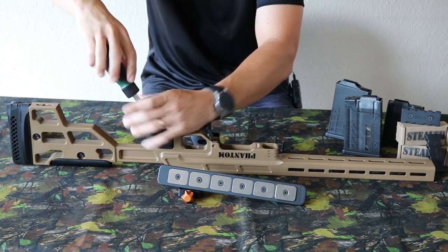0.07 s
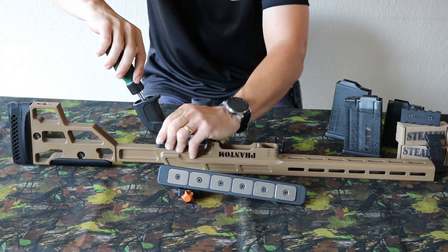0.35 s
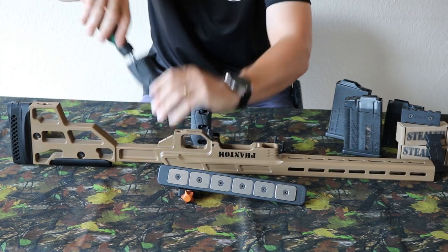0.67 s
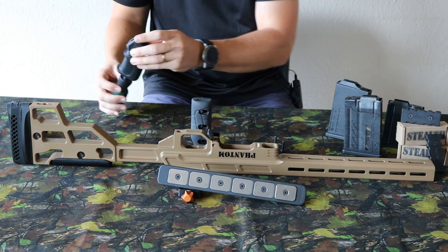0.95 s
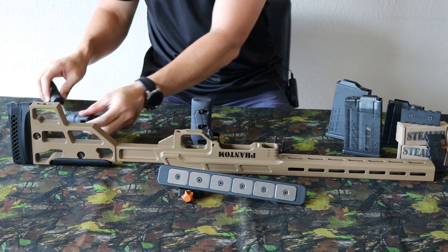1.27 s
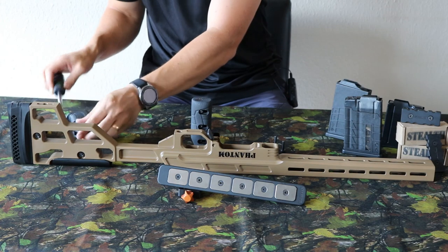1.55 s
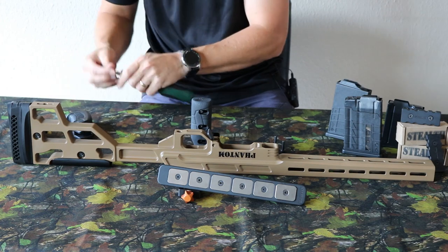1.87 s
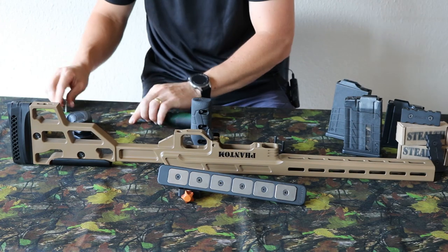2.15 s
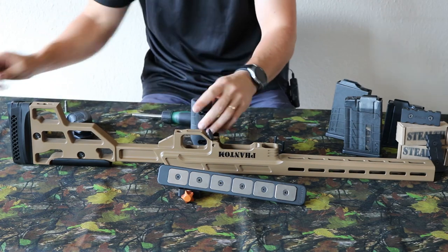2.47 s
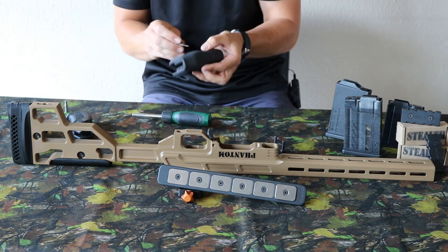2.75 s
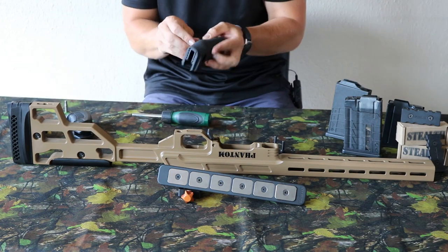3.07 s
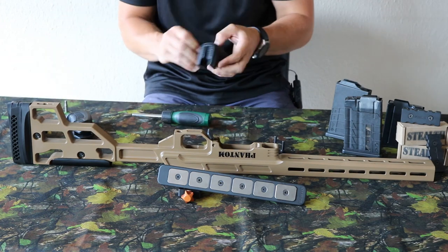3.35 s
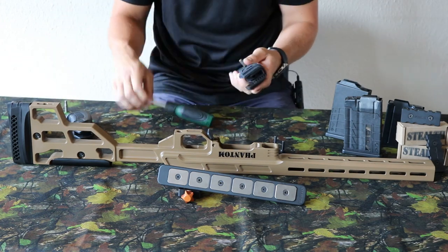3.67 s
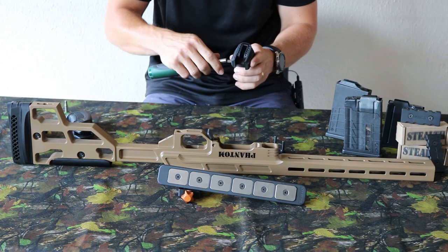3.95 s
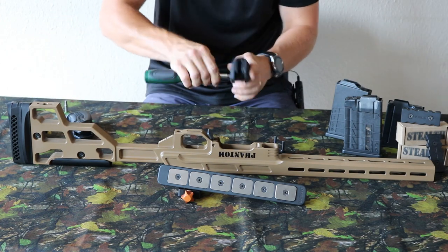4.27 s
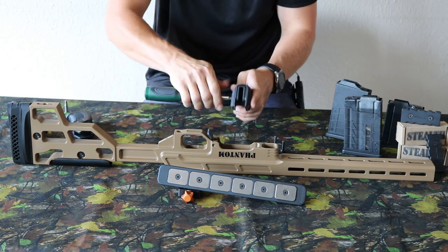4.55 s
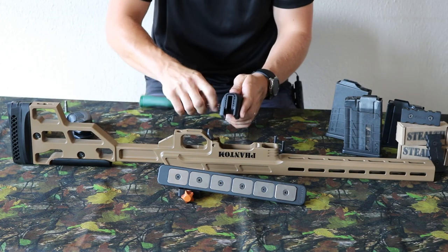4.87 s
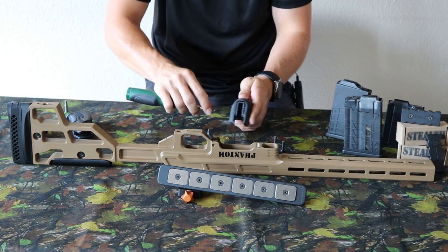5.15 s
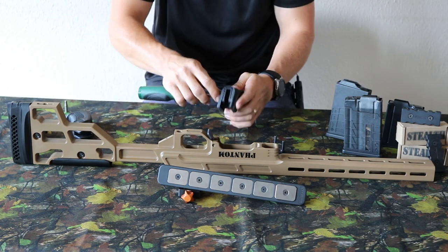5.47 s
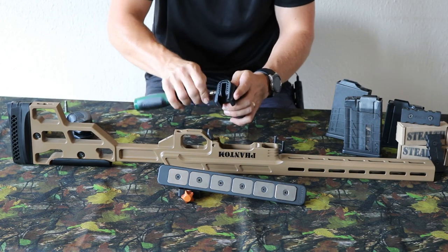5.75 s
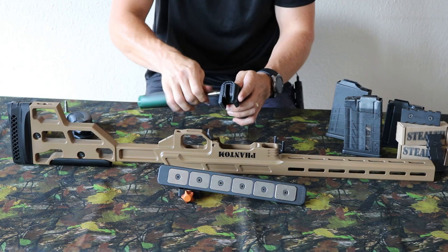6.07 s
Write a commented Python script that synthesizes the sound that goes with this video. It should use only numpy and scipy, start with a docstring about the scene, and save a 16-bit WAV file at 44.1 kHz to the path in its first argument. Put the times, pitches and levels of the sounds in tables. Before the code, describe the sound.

Plastic clacks, steel clinks and hollow knocks as a rifle grip comes off on a table, then sparse screwdriver ticks.

```python
"""Sharp plastic clacks, steel clinks and booming knocks, then small, sparse ticks: a plastic grip comes
off a metal rifle chassis on a cloth-covered table. Parts knock and slide and set the table ringing,
a loose screw clinks and jingles, and the grip sticks and slips on the stock with a squeak. The screwdriver
tip ticks in the screw head, and fingers swish round the handles over the quiet hum of a small room."""
import sys
import numpy as np
from scipy import signal
from scipy.fft import rfft, irfft
from scipy.io import wavfile

SR = 44100
rng = np.random.default_rng(int(sys.argv[2]) if len(sys.argv) > 2 else 0)


def wav_out(sig):
    """Save sig, one row per channel (or a flat mono array), as 16-bit PCM at SR to the path in sys.argv[1]."""
    wavfile.write(sys.argv[1], SR, np.round(np.clip(np.atleast_2d(sig).T, -1, 1) * 32767).astype(np.int16))


N = 269451
TIME = np.arange(N) / SR
AGE = TIME[:SR // 2]   # seconds since a hit

# resonances of table and chassis: (frequency [Hz], level [dB], t60 [s])
TABLE_MODES = [(212.4, -20, 0.12), (226, -10.5, 0.0073), (271.4, 0.5, 0.18), (357, -13, 0.15),
               (405, -33, 0.012), (541.5, -6.5, 0.18), (627, -7, 0.088), (723, 2, 0.017), (838, 1.5, 0.038),
               (960, 2, 0.025), (1050, 5, 0.015), (1090, 0, 0.066), (1250, -32, 0.12), (1440, -14, 0.069),
               (1520, -22, 0.18), (1890, 0, 0.028), (2217, -16.5, 0.012), (2970, -5.5, 0.043)]


def clacks(level_db=2, hollow_t60_s=0.024, snap_db=-7):
    """Struck plastic: its hollow rings at a note set by the hand, shorter when it is held tight."""
    # hits on grip or screwdriver handle:
    # (time [s], level [dB], hollow note [Hz], treble [dB], ring length [ratio])
    hits = [(0.042, -38, 1910, -5, 1.0), (0.1192, -25.5, 3400, -2, 0.22), (0.226, -35.5, 1500, -2, .4),
            (0.497, -23.5, 2230, -5, 0.94), (1.089, -30, 3000, 3, 0.24), (1.1141, -12, 2420, 14.5, 0.22),
            (1.2458, -10.5, 1474, -25, 0.77), (2.1691, -26, 1130, -35, 0.49),
            (2.2304, -10, 4330, -12, 0.11)]
    # resonances of the plastic: (frequency [Hz], level [dB], t60 [s])
    grip_modes = [(3400, -13.5, 0.018), (5940, -13.5, 0.021), (8500, -34, 0.05), (9670, -11, 0.012),
                  (11200, -18, 0.01), (11900, -17, 0.0078), (13800, -19, 0.0083), (15200, -19, .025),
                  (15400, -32, .04)]
    out = np.zeros(N)
    for s, db, hz, treble_db, ring_length in hits:
        modes = np.array([(hz, 0, hollow_t60_s), *grip_modes]) * [1, 1, ring_length]
        clack = ring(modes) + from_db(snap_db) * snap(length_s=0.0041)
        add(out, s, from_db(db + level_db) * brighten(clack, treble_db, corner_hz=4900))
    return out


def clinks(level_db=2):
    """Steel on steel: a scratch and a short, high ring."""
    # the screw hits the screwdriver shaft: (time [s], level [dB], scratch [dB])
    hits = [(0.1564, -33.5, 2), (0.8575, -14, -10.5), (0.8651, -18, -6), (1.158, -36, -2), (1.176, -22, 2),
            (1.183, -29, 2), (1.2012, -27.5, -2), (1.2153, -21, -3)]
    # resonances of the steel: (frequency [Hz], level [dB], t60 [s])
    steel_modes = [(2040, 2.5, 0.0074), (3350, 4, 0.0066), (3500, -14, 0.0046), (6430, -14, 0.008),
                   (6650, 7, 0.012), (6790, 7, 0.029), (7200, -12, 0.008), (9260, -2, 0.021),
                   (11700, -21, 0.0065), (14600, -26, .006)]
    out = np.zeros(N)
    for s, db, scratch_db in hits:
        note = ring(steel_modes) + from_db(scratch_db) * snap(length_s=0.0011)
        add(out, s, from_db(db + level_db) * note / np.abs(note).max())
    return out


def knocks(clatter_db=-4, impact_db=-2, snap_db=-19, boom_db=-3, crack_db=-3):
    """A short impact sets table and chassis ringing; hardness trades boom for crack."""
    # parts land on the table or against the chassis: (time [s], level [dB], hardness [dB])
    hits = [(0.1192, -46.5, -1), (1.1762, -49, -7), (1.2465, -26.5, -1.5), (1.3032, -39.5, -4),
            (1.3058, -37.5, 8), (1.4001, -36.5, -10), (1.5462, -31.5, -10), (1.6596, -29, -11.5),
            (2.1684, -45.5, -8.5), (2.2293, -28, -5.5), (2.3094, -57, -20), (2.599, -65, 1),
            (3.8098, -52, -5.5)]
    # the hard, quickly damped swing of the struck spot: (frequency [Hz], level [dB], t60 [s])
    impact_modes = [(676, 17, 0.016), (1160, 7, 0.033), (1635, -1, 0.028), (3000, 7.5, 0.0024),
                    (3520, 7, 0.00088), (5030, -37, 0.0077), (10000, -25, 0.002), (12900, -16, 0.002)]
    # the crowd of short-lived modes between the main ones: (frequency [Hz], level [dB])
    clatter_colour = [(150, -37), (300, 3.5), (500, 3), (800, 4.5), (1400, 2.5), (2200, 4), (3500, -1),
                      (5500, 2), (7000, -8.5), (9300, -24.5), (12000, -38), (16000, -32)]
    # decay of that clatter: (frequency [Hz], t60 [s])
    clatter_t60 = [(200, 0.085), (800, 0.16), (2500, 0.08), (8000, 0.05), (16000, 0.045)]
    edges_hz = (190, 400, 2000, 16000)   # boom, body, crack
    out = np.zeros(N)
    for s, db, hardness_db in hits:
        levels_db = db + np.array([boom_db - hardness_db, 0, crack_db + hardness_db])
        impact = from_db(impact_db) * cut(ring(impact_modes), 750, "high")
        impact += from_db(snap_db) * snap(length_s=0.0018)
        body = ring(TABLE_MODES) + from_db(clatter_db) * dying_noise(clatter_colour, clatter_t60)
        knock = voiced(impact + body, edges_hz, levels_db, attack_samples=882)
        add(out, s, knock + from_db(levels_db[0]) * table_sway())
    return out


def table_sway(hz=104, t60_s=0.1, level_db=-17):
    """The whole table top gives a little under a blow."""
    return from_db(level_db) * np.sin(2 * np.pi * hz * AGE) * decay(t60_s)


def ticks(slip_s=0.0014, slip_db=-15, tail_db=-8, thread_start_s=4.6554, thread_gap_s=0.099):
    """The tip skids for an instant and the hand damps it at once; the room answers with a broad hiss."""
    # screw and tip catch and slip: (time [s], level [dB], hardness [dB], tip ring [dB])
    slips = [(0.3088, -54, 4, -5), (1.8201, -45.5, -1, 0), (1.9278, -65, 14, 5), (2.0197, -54.5, 14, 1),
             (3.0456, -62.5, 12.5, 5), (3.276, -53, 10.5, 5.5), (3.33, -52, -6, 3), (3.8847, -62, 3, 5),
             (4.033, -49.5, -0.5, -13), (4.0811, -54.5, -1, 13.5), (4.1344, -39, 7.5, 5),
             (4.2163, -30, 0, 7), (4.3213, -50, 8, 10.5), (4.405, -57, -12, 3), (4.5543, -56.5, 6, 8),
             (5.4286, -55.5, -3.5, -3), (5.5803, -43, 4, 5.5), (5.6728, -60, -12.5, -4),
             (5.79, -45.5, 7, 2), (5.9769, -52.5, 3, 17), (6.0926, -51.5, 3, 6.5)]
    # resonances of the tip: (frequency [Hz], level [dB], t60 [s])
    tip_modes = [(990, -27, 0.028), (1500, -44, 0.008), (2800, 7, 0.0035), (4300, 9, 0.0023),
                 (6400, -11, 0.0023), (7150, 5, 0.00091), (10860, -4.5, 0.0022), (13500, 5.5, 0.0014),
                 (14800, -9, 0.0036)]
    # share of the hardness each band gets: (body [ratio], tip [ratio], ring [ratio], sparkle [ratio])
    tilt = (-1.16, 0.1, 0.72, 1)
    # the tick as it spreads into the room in all directions: (frequency [Hz], level [dB])
    tail_colour = [(300, -40), (1000, -6.5), (2700, -1), (4500, -1.5), (6500, -1), (8500, -5), (10000, -6),
                   (16000, -14)]
    # the thread catches in an even run of faint ticks as the screw turns; columns as in slips
    thread_catches = [(thread_start_s + k * thread_gap_s, -59, 5, 3) for k in range(3)]
    edges_hz = (400, 3300, 5500, 9000, 16500)   # body, tip, ring, sparkle
    out = np.zeros(N)
    for s, db, hardness_db, tip_db in slips + thread_catches:
        levels_db = db + hardness_db * np.array(tilt) + np.array([0, tip_db, 0, 0])
        click = AGE == 0
        skid = from_db(slip_db) * rng.standard_normal(len(AGE)) * np.exp(-AGE / slip_s)
        tip = signal.fftconvolve(ring(tip_modes), click + skid)[:len(AGE)]
        tick = voiced(tip, edges_hz, levels_db, attack_samples=110)
        add(out, s, tick + from_db(tail_db) * np.linalg.norm(tick) * room_tail(tail_colour))
    return out


def jingles(gap_s=0.0066, loss_db=2, buzz_db=-1, hops=5):
    """A small loose metal part hops and buzzes a few times, weaker each time."""
    # heavy thumps shake the part: (time [s], first hop's peak [dB])
    shakes = [(1.551, -35.5), (1.667, -34)]
    # resonances of the part: (frequency [Hz], level [dB], t60 [s])
    modes = [(6820, -2.5, 0.036), (8250, -21, 0.0043), (8560, 2, 0.03), (9000, -3, 0.03), (9200, -5, .06),
             (11270, -10, 0.055), (12600, -14, .015), (13800, -4, .05)]
    out = np.zeros(N)
    for s, db in shakes:
        for hop in range(hops):
            note = ring(modes) + from_db(buzz_db) * cut(snap(length_s=0.011), [6000, 14500], "band")
            landing_s = s + gap_s * (hop + rng.random() / 2)
            add(out, landing_s, from_db(db - loss_db * hop) * note / np.abs(note).max())
    return out


def squeaks(partials_db=(-5, 2, -12, -14), jitter_depth=0.11, flutter_db=3):
    """Stick and slip: a rough, unsteady tone that follows the sliding speed."""
    # the grip slides on the stock:
    # (start [s], length [s], start pitch [Hz], middle pitch [Hz], end pitch [Hz], level [dB])
    slides = [(1.173, 0.06, 1100, 783, 590, -39.5), (1.315, 0.0245, 1050, 1533, 920, -41.5)]
    out = np.zeros(N)
    jitter = 1 + jitter_depth * wobble(800)
    for s, length_s, *glide_hz, db in slides:
        pitch = np.interp(TIME, [s, s + length_s / 2, s + length_s], glide_hz) * jitter
        phase = 2 * np.pi * np.cumsum(pitch) / SR
        tone = sum(from_db(level) * np.sin(k * phase) for k, level in enumerate(partials_db, 1))
        out += tone * strokes([(s, length_s, db)], attack_s=0.0022, release_s=0.0064)
    return out * from_db(flutter_db * wobble(430))


def drags(groan_db=1, scuff_hz=(460, 880), attack_s=0.009, release_s=0.015):
    """Friction on the cloth keeps the low table modes groaning; a dry scuff lies above them."""
    # parts slide on the table top: (start [s], length [s], level [dB], relative scuff [dB])
    slides = [(0.101, 0.055, -53.5, 6), (0.187, 0.09, -47.5, -23), (0.473, 0.073, -49, -6),
              (2.138, 0.048, -45.5, -9.5), (2.444, 0.06, -66, 10), (2.568, 0.073, -44, -19),
              (3.703, 0.14, -46, -10.5)]
    low_modes = cut(cut(ring(TABLE_MODES), 340, "low", order=4), 220, "high", order=4)
    force = strokes([(s, span, db + groan_db) for s, span, db, _ in slides], attack_s, release_s)
    scuff = strokes([(s, span, db + lift) for s, span, db, lift in slides], attack_s, release_s)
    groan = signal.fftconvolve(force * rng.standard_normal(N), energy_one(low_modes))[:N]
    return groan + scuff * rms_one(cut(rng.standard_normal(N), scuff_hz, "band"))


def hand_rubs(level_db=-2, grain_db=7):
    """Skin drags over plastic and metal in a fine, uneven grain."""
    # hands slide over chassis and table: (start [s], length [s], level [dB])
    rubs = [(0.0, 0.17, -52), (0.1, 0.35, -54), (0.46, 0.22, -59), (1.17, 0.07, -49), (2.09, 0.31, -54),
            (3.78, 0.11, -47.5)]
    # mid-heavy skin friction: (frequency [Hz], level [dB])
    colour = [(200, -6), (500, 8.5), (900, 4), (1600, 4.5), (2600, -9), (5000, -6), (7000, -9),
              (15000, -34)]
    grain = from_db(grain_db * wobble(120))
    force = strokes(rubs, attack_s=0.05, release_s=0.12)
    return from_db(level_db) * force * rms_one(noise(colour) * grain)


def swishes(attack_s=0.072, release_s=0.12, grain_db=1):
    """A light touch gives a smooth swish with a thin hiss on top."""
    # fingers slide round grip and handle: (start [s], length [s], level [dB], relative hiss [dB])
    slides = [(0.13, 0.65, -57, -9.5), (0.824, 0.39, -56, -16), (1.368, 0.4, -60, -4),
              (1.743, 0.17, -52.5, -9), (1.993, 0.39, -54.5, -9), (2.585, 0.25, -56, -12),
              (2.79, 0.28, -62, -4), (3.234, 0.35, -56, -9), (3.75, 0.26, -59, -9), (4.04, 0.7, -60, -8.5),
              (4.862, 0.36, -60, -15), (5.499, 0.41, -58.5, -17)]
    # soft finger friction: (frequency [Hz], level [dB])
    colour = [(200, -4), (500, -3), (900, 2.5), (1500, 1), (2000, -1), (2600, 2), (3300, -4), (5400, -11),
              (6600, -14.5), (15000, -15.5)]
    grain = from_db(grain_db * wobble(41))
    swish = strokes([(s, span, db) for s, span, db, _ in slides], attack_s, release_s)
    hiss = strokes([(s, span, db + lift) for s, span, db, lift in slides], attack_s, release_s)
    return grain * (swish * noise(colour) + hiss * wavering(hz=4850, width_hz=900))


def rumbles():
    """Shifting weight stirs the table into a dull rumble."""
    # arms shift on the table: (start [s], length [s], level [dB])
    shifts = [(0.28, 0.477, -59), (2.8, 0.377, -56)]
    # the table's low end: (frequency [Hz], level [dB])
    colour = [(25, -28), (60, -1), (100, 2.5), (160, -6), (320, -4), (500, -26.5), (2000, -58)]
    return strokes(shifts, attack_s=0.012, release_s=0.042) * noise(colour)


def room(x, wet_db=-9):
    """A small, well damped room adds a short tail."""
    # tone of the reflections: (frequency [Hz], level [dB])
    colour = [(150, 0), (300, 1.5), (500, 3), (1000, -2.5), (3000, -1), (6500, -2.5), (10000, -0.5),
              (16000, -10)]
    return x + from_db(wet_db) * signal.fftconvolve(x, room_tail(colour))[:N]


def room_tail(colour, bounce_s=0.00661, bounce_db=2, bounce_width_s=0.00011):
    """Reflections start with a cluster off the table top and then die away; energy 1."""
    # decay of the room: (frequency [Hz], t60 [s])
    t60s = [(200, 0.15), (2500, 0.2), (7000, 0.23), (16000, 0.15)]
    build_up = np.clip(2 * AGE / bounce_s - .5, 0, 1)
    bounce = from_db(bounce_db) * np.exp(-((AGE - bounce_s) / bounce_width_s) ** 2)
    return energy_one((build_up + bounce) * dying_noise(colour, t60s))


def room_tone(air_db=-61, hiss_db=-58.5):
    """Room air and hums reach both channels alike; each channel has its own hiss."""
    # a low drone: (frequency [Hz], width [Hz], level [dB])
    drone = (96.8, 35.7, -63)
    # a deep hum and a faint higher one: (frequency [Hz], width [Hz], level [dB])
    hums = [(59.2, 41, -65), (787, 23.6, -71.5)]
    # dark room air: (frequency [Hz], level [dB])
    air_colour = [(20, -5), (45, -16), (70, -1), (130, -5.5), (200, -6), (300, -10.5), (750, -13.5),
                  (1100, -17), (2000, -17), (3500, -22.5), (6000, -24), (16000, -31)]
    # nearly white hiss: (frequency [Hz], level [dB])
    hiss_colour = [(30, -1), (300, 3.5), (800, 2.5), (2500, 1.5), (14000, 2), (16000, -3)]
    hum = sum(from_db(db) * wavering(hz, width_hz) for hz, width_hz, db in [drone, *hums])
    air = from_db(air_db) * noise(air_colour)
    hiss = from_db(hiss_db) * np.array([noise(hiss_colour), noise(hiss_colour)])
    return air + hum + hiss


def ring(modes, scatter_db=2):
    """Struck modes; each blow lands elsewhere and shares out its strength anew. Energy 1."""
    hz, db, t60 = np.transpose(modes)[:, :, None]
    strength = from_db(db + scatter_db * rng.standard_normal(hz.shape))
    return energy_one(np.sum(strength * np.sin(2 * np.pi * hz * AGE) * decay(t60), axis=0))


def snap(length_s):
    """The rough instant of contact; energy 1."""
    return energy_one(cut(rng.standard_normal(len(AGE)) * np.exp(-AGE / length_s), 1500, "high"))


def brighten(x, treble_db, corner_hz):
    """A harder contact lifts the treble, a softer one dulls it; peak 1."""
    x = x + (from_db(treble_db) - 1) * cut(x, corner_hz, "high", order=1)
    return x / np.abs(x).max()


def voiced(blow, edges_hz, levels_db, attack_samples):
    """Where and how hard a blow lands sets the level of each band over its attack."""
    out = 0
    for k, db in enumerate(levels_db):
        band = cut(blow, edges_hz[k:k + 2], "band")
        polarity = (-1) ** k   # neighbouring bands meet in opposite phase
        out = out + polarity * from_db(db) * band / np.std(band[:attack_samples])
    return out


def strokes(rows, attack_s, release_s):
    """Force of sliding movements: each builds up, holds and lets go."""
    force = np.zeros(N)
    for s, length_s, db in rows:
        rise = np.clip((TIME - s) / attack_s, 0, 1)
        fall = np.clip((s + length_s - TIME) / release_s, 0, 1)
        force += from_db(db) * rise * fall
    return force


def dying_noise(colour, t60s):
    """A burst whose bands each die at their own rate; energy 1."""
    edges = np.geomspace(100, 18000, 16)
    hz = np.fft.rfftfreq(len(AGE), 1 / SR)
    spectrum = rfft(rng.standard_normal(len(AGE))) * from_db(at_hz(colour, hz))
    out = 0
    for low, high in zip(edges, edges[1:]):
        band = irfft(spectrum * (hz >= low) * (hz < high), len(AGE))
        out = out + band * decay(at_hz(t60s, np.sqrt(low * high)))
    return energy_one(out)


def noise(colour):
    """Steady noise of a given spectrum; rms 1."""
    gain = from_db(at_hz(colour, np.fft.rfftfreq(N, 1 / SR)))
    return rms_one(irfft(rfft(rng.standard_normal(N)) * gain, N))


def wavering(hz, width_hz):
    """Noise through one resonance twice: an unsteady hum when low, a thin hiss when high; rms 1."""
    radius = np.exp(-np.pi * width_hz / SR)
    resonance = [1, 0, -1, 1, -2 * radius * np.cos(2 * np.pi * hz / SR), radius ** 2]
    return rms_one(signal.sosfilt([resonance, resonance], rng.standard_normal(N)))


def wobble(hz):
    """Random modulation up to about a given rate; rms 1."""
    return rms_one(cut(rng.standard_normal(N), hz, "low"))


def decay(t60_s):
    """An envelope that falls 60 dB in the given time."""
    return np.exp(-np.log(1000) * AGE / t60_s)


def cut(x, hz, kind, order=2):
    """Causal Butterworth filter."""
    return signal.sosfilt(signal.butter(order, hz, kind, fs=SR, output="sos"), x + 1e-18)


def add(track, s, sound):
    """Mix a sound in from a given moment."""
    start = round(s * SR)
    track[start:start + len(sound)] += sound[:N - start]


def at_hz(points, hz):
    """Read a table on a log-frequency axis."""
    points = np.array(points)
    return np.interp(np.log(hz + 1e-9), np.log(points[:, 0]), points[:, 1])


def from_db(db):
    """Decibels to gain."""
    return 10 ** (np.asarray(db) / 20)


def rms_one(x):
    """Scale to unit power."""
    return x / np.sqrt(np.mean(x ** 2) + 1e-20)


def energy_one(x):
    """Scale to unit energy."""
    return x / np.linalg.norm(x)


def scene():
    """All the handling sounds over the room tone; the ticks bring their own tails."""
    handling = knocks() + drags() + clinks() + clacks() + jingles() + squeaks() + hand_rubs()
    return room(handling) + ticks() + swishes() + rumbles() + room_tone()


def record(dry):
    """A steep low-pass takes off the very top."""
    cutoff_hz = 16100
    return signal.sosfilt(signal.ellip(10, .1, 80, cutoff_hz, fs=SR, output="sos"), dry)


dry = scene()
out = record(dry)
wav_out(out)
```